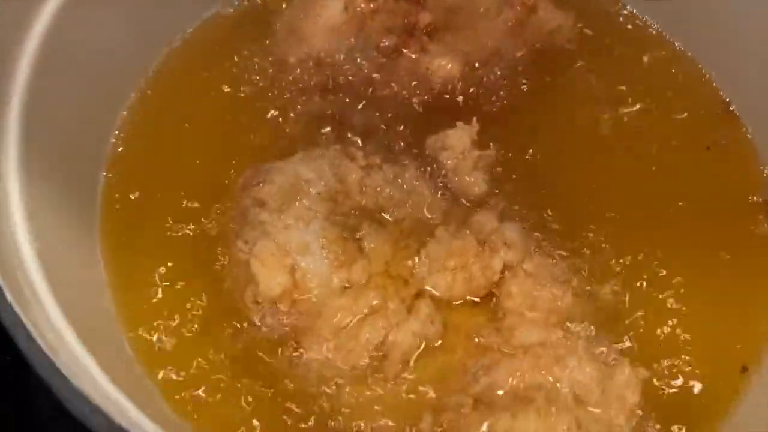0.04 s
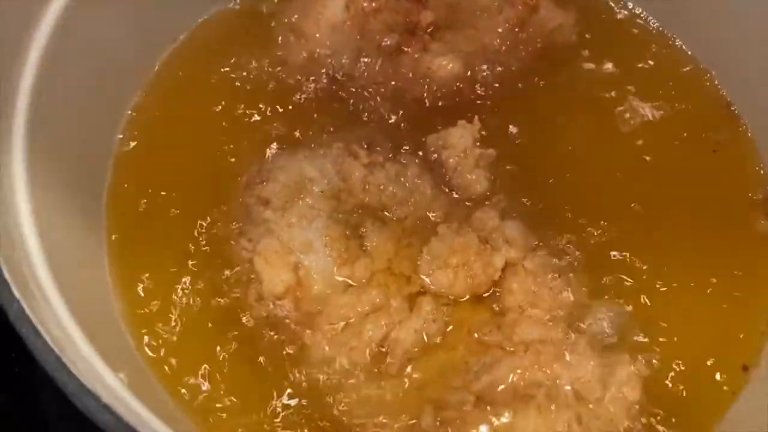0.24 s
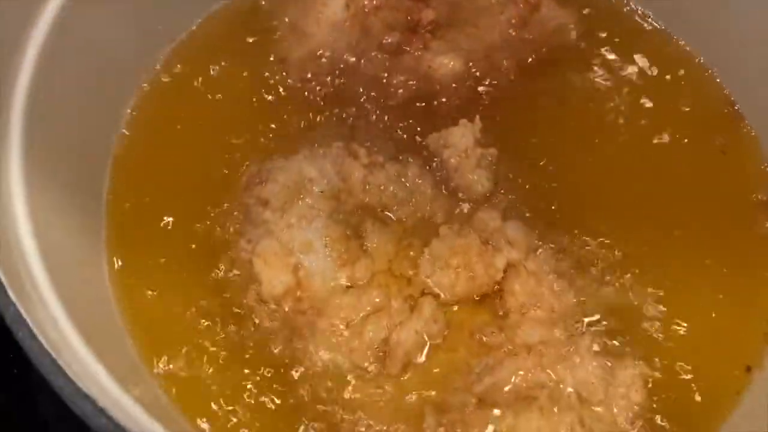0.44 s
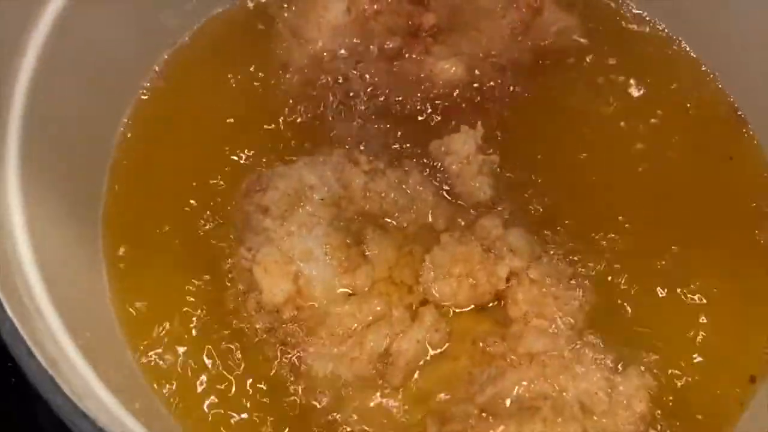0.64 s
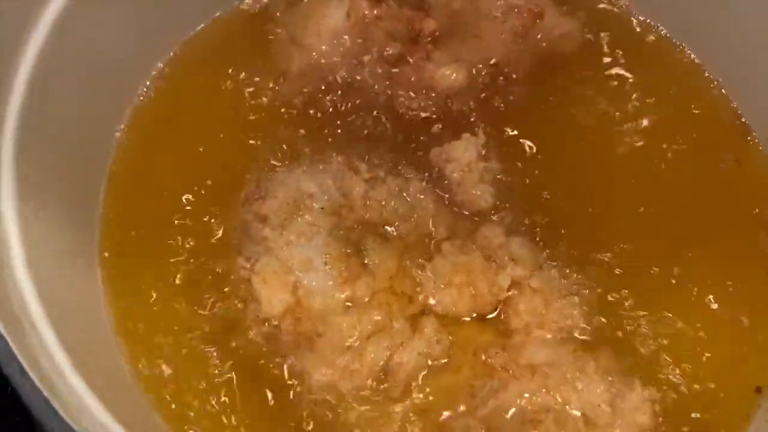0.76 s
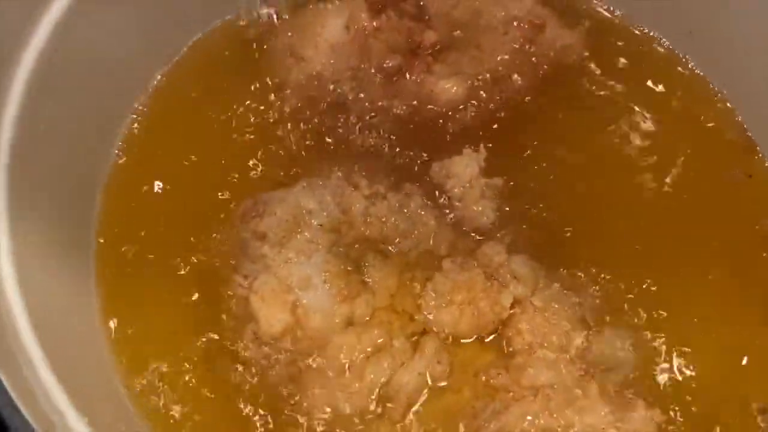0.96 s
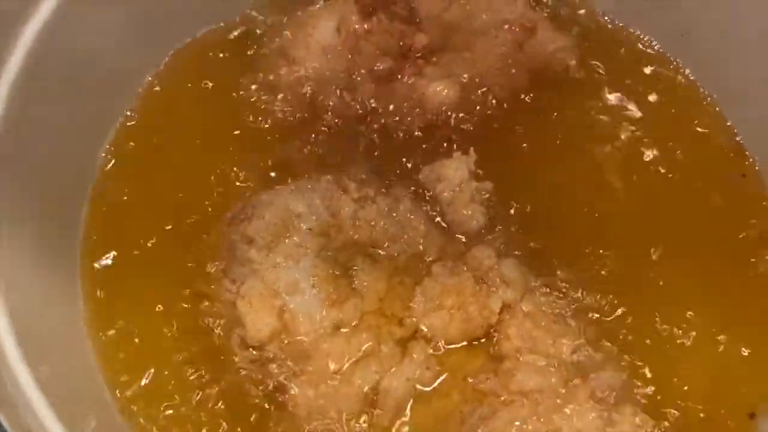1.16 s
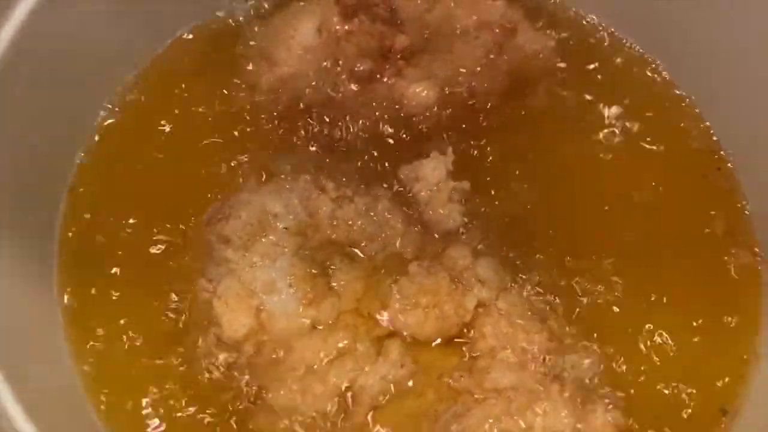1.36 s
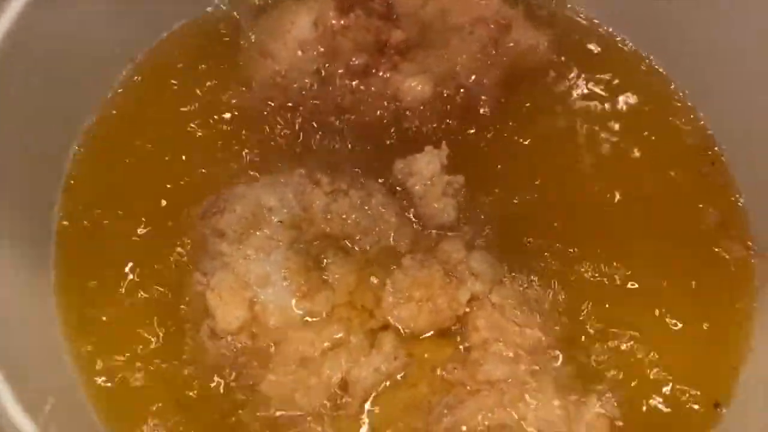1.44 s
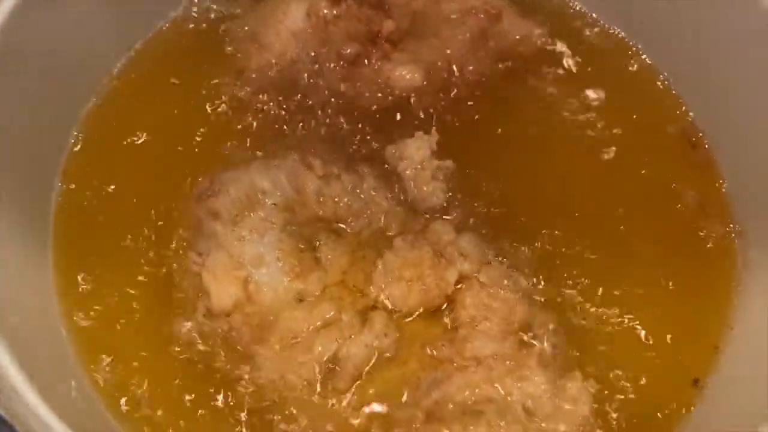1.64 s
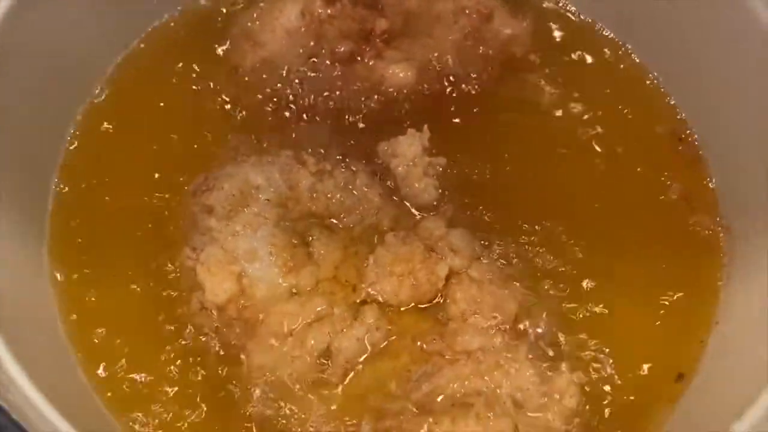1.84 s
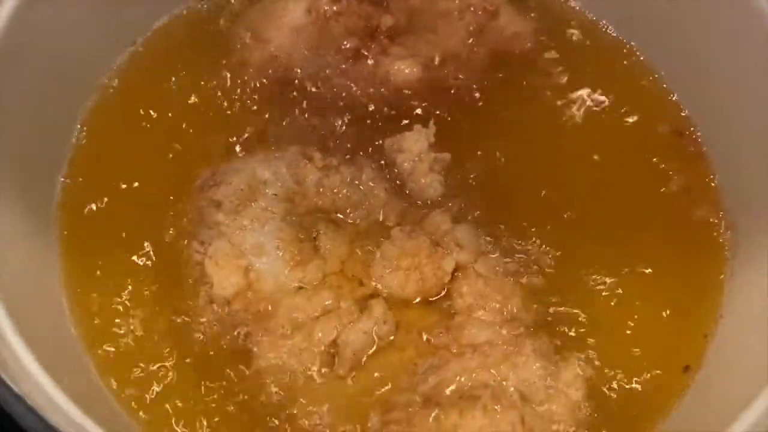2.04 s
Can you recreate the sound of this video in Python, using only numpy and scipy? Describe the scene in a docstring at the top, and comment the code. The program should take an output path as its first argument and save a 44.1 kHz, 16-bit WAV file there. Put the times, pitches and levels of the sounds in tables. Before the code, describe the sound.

Chicken pieces fry in a pot of hot oil with a dense, unbroken sizzle; irregular dry snaps and short ringing pops stand out, while a low wavering burner or fan hum rumbles beneath. Close stereo microphone above the pot.

```python
"""Chicken fries in a pot of hot oil, heard from just above. Thousands of tiny steam bubbles burst each second
in a dense sizzle, made of short fading rings over noise. A few bubbles snap sharply, ring briefly or
come in quick flurries, and the pot walls throw bubble sounds back as short noisy echoes.
Under it lies a low rumble of filtered noise with a wavering hum, probably the burner and an extractor fan."""
import sys
import numpy as np
from scipy import signal
from scipy.fft import rfft, irfft, next_fast_len
from scipy.io import wavfile
from scipy.ndimage import uniform_filter1d, map_coordinates

SR = 44100
rng = np.random.default_rng(int(sys.argv[2]) if len(sys.argv) > 2 else 0)


def to_wav(sig):
    """Store sig (one row per channel, or 1-D mono) as 16-bit WAV at the path in sys.argv[1].

    Samples outside -1..1 are clipped; the rate is SR.
    """
    pcm = np.clip(np.atleast_2d(sig), -1, 1) * 32767
    pcm = np.round(pcm).astype(np.int16)
    wavfile.write(sys.argv[1], SR, pcm.T)  # frames by channels


N = 92345  # length in samples
TOP_HZ = 15800  # nothing sounds above this


def amp(db):
    """Turn decibels into a plain multiplier."""
    return 10 ** (np.asarray(db) / 20)


def unit(x):
    """Scale a signal to an average (RMS) level of 1."""
    return x / np.sqrt(np.mean(x ** 2) + 1e-20)


def along(points, hz):
    """Read a value at each frequency from (Hz, value) points on a log axis."""
    f, v = np.transpose(points)
    return np.interp(np.log(hz + 1), np.log(f + 1), v)


def curve(rows):
    """One value per sample from (s, value) rows."""
    return np.interp(np.arange(N) / SR, *np.transpose(rows))


def wobble(rate):
    """A smooth random curve through `rate` random points a second."""
    points = rng.standard_normal(int(N * rate / SR) + 4)
    return map_coordinates(points, [np.arange(N) * rate / SR])


def filtered(x, response):
    """Multiply the spectrum of x by a response that depends on frequency."""
    m = next_fast_len(N + SR // 2)
    hz = np.fft.rfftfreq(m, 1 / SR)
    return irfft(rfft(x, m) * response(hz), m)[..., :N]


def add(track, s, sound):
    """Mix a sound into a track at time s, cutting what runs past the end."""
    part = track[..., round(s * SR):][..., :sound.shape[-1]]
    part += sound[..., :part.shape[-1]]


def stove(size=1900):
    """Low rumble from shaped noise with a wavering hum; the band around the hum surges."""
    # Colour of the rumble: pitch_hz [Hz], level_db [dB per Hz, relative]
    rumble_colour = [(8, -70), (22, -44), (32, -39), (45, -12), (58, -5.5), (70, -8), (88, -0.5), (104, -5),
                     (122, 1), (145, -4), (200, -10.5), (228, -8.5), (255, -11), (278, -5.5), (305, -5),
                     (330, -11), (400, -22), (600, -25), (1200, -51)]
    # Surges of the band around the hum: time_s [s], level_db [dB, before the common trim]
    surges = [(0.0, -25), (0.02, -23), (0.05, -31), (0.09, -25.5), (0.12, -31), (0.15, -22), (0.18, -27),
              (0.35, -21), (0.42, -30.5), (0.44, -24), (0.47, -30), (0.49, -25), (0.72, -23.5), (0.74, -28),
              (0.8, -34), (0.84, -24.5), (0.86, -27), (0.94, -18), (0.99, -27), (1.08, -28.5), (1.11, -23),
              (1.13, -28.5), (1.22, -23), (1.29, -31.5), (1.32, -21.5), (1.34, -32), (1.37, -23.5),
              (1.44, -26), (1.59, -26.5), (1.61, -19.5), (1.66, -29.5), (1.76, -23.5), (1.79, -29),
              (1.8, -24), (1.87, -26.5), (1.89, -24), (1.91, -33), (1.93, -20.5), (2.0, -29), (2.02, -21),
              (2.07, -32), (2.09, -27)]
    hum_hz, hum_db = 121.1, -9  # level against the rumble
    waver_db, drift_rad = 6, 1.6  # multiply random curves of level and phase
    above_hz, below_hz, trim_db = 61, 185, -0.84  # edges of the surging band, and its trim

    rumble = unit(filtered(rng.standard_normal((2, N)), lambda hz: amp(along(rumble_colour, hz))))
    phase = 2 * np.pi * hum_hz * np.arange(N) / SR + drift_rad * wobble(8.3)
    hum = np.sin(phase) * amp(waver_db * wobble(11))
    low = filtered(rumble, lambda hz: 1 / (1 + (hz / below_hz) ** 8) - 1 / (1 + (hz / above_hz) ** 8))
    deep = low + amp(hum_db) * np.array([unit(hum), np.zeros(N)])
    # level out the band's own ups and downs, so that the table alone sets the surges
    power = np.abs(uniform_filter1d(deep ** 2, size, axis=1))
    even = deep / np.sqrt(power + 1e-9)
    surge_db = curve(surges)
    return amp(surge_db + trim_db) * even + amp(surge_db.mean()) * (rumble - low)


def pot(x, size=2048):
    """A sound and its quick echoes off the pot walls, drawn anew for every place in the oil."""
    t60_s, wet_db, build_s = 0.048, -4, 0.00067  # fade by 60 dB, energy against the direct sound, build-up
    t = np.arange(size) / SR
    echo = rng.standard_normal(size) * amp(-60 * t / t60_s) * (1 - np.exp(-t / build_s))
    echo *= amp(wet_db) / np.linalg.norm(echo)
    echo[0] = 1  # the direct sound
    return signal.fftconvolve(x, echo)


def bubbles(rate, cycles, cap_db, lowest_hz, size, count=3):
    """Tiny bubbles bursting in clumps at several places, each a short damped ring."""
    cycle_spread = 0.51  # how widely ring lengths vary
    size_spread_db, clump_db = 4.5, 1  # mean rise of bubble level; scale of the random clumping
    out, k = np.zeros(N), np.arange(size)
    for stream in rng.spawn(count):
        u = stream.random((int(rate * N / SR / count), 4))
        start = (u[:, 0] * N).astype(int)
        hz = lowest_hz + u[:, 1] * (TOP_HZ - lowest_hz)
        # samples to fall to 1/e, with a bell-like (logistic) spread of its logarithm
        stretch = np.exp(cycle_spread * np.log(u[:, 2] / (1 - u[:, 2])) / 2)
        life = np.clip(cycles * stretch * SR / hz, 1, size / 4)
        # many weak bubbles, few strong ones
        db = np.minimum(-size_spread_db * np.log(1 - u[:, 3]), cap_db)
        db = db + clump_db * wobble(40.04)[start]
        strength = amp(db) / np.sqrt(life)
        fade = np.exp(-k / life[:, None])
        rings = strength[:, None] * fade * np.sin(2 * np.pi * hz[:, None] * k / SR)
        place = np.bincount((start[:, None] + k).ravel(), rings.ravel())
        out += pot(place)[:N]
    return unit(out)


def crackle():
    """Many dry bursts and fewer bubbles that ring on; cycles count the swings of a typical fall to 1/e."""
    dry_bursts = bubbles(rate=8000, cycles=1.23, cap_db=20.5, lowest_hz=308, size=128)
    ringing = bubbles(rate=1100, cycles=7.2, cap_db=14.5, lowest_hz=2005, size=700)
    return unit(dry_bursts + amp(-7) * ringing)


def patchy(x, depth_db, size=256):
    """Swarms of like-sized bubbles come and go, so that bands swell and fade."""
    z = signal.stft(x, nperseg=size)[2]
    patch = np.outer(np.hanning(7), np.hanning(14))  # smooths over pitch and time
    field = signal.fftconvolve(rng.standard_normal(z.shape[1:]), patch, 'same')
    return signal.istft(z * amp(depth_db * unit(field)), nperseg=size)[1][:, :N]


def ping(hz, t60, size=2048):
    """One larger bubble: a short ring whose pitch climbs."""
    attack_s, rise = 0.00021, 0.076  # onset; share by which the pitch climbs during t60
    t = np.arange(size) / SR
    ring = np.sin(2 * np.pi * hz * t * (1 + rise * t / t60 / 2))
    return pot(ring * amp(-60 * t / t60) * (1 - np.exp(-t / attack_s)))


def snap(hz, octaves, size=1024, count=8):
    """A sharp burst: a cluster of heavily damped rings around one pitch."""
    t60_s = 0.0048  # time to fade by 60 dB: it dies almost at once
    t = np.arange(size) / SR
    offsets = np.linspace(-1, 1, count) + rng.uniform(-1, 1, count) / count
    pitches = hz * 2 ** (octaves * offsets)
    rings = np.sin(2 * np.pi * (pitches[:, None] * t + rng.random((count, 1)))).sum(0)
    fade = amp(-60 * t / t60_s)
    # the same energy however the rings happen to add up
    return pot(rings * fade * np.linalg.norm(fade) / np.linalg.norm(rings * fade))


def pops(count=7):
    """Bubbles that stand out: dry snaps, rings of climbing pitch and quick flurries."""
    # Sharp bursts at the surface: start_s [s], pitch_hz [Hz], half_width [octaves], level_db [dB]
    snaps = [(0.015, 3330, 0.55, -15), (.186, 12000, .3, -28), (.2835, 11000, .5, -19),
             (.317, 3600, .7, -21), (0.44, 2240, 0.47, -13), (.4717, 4500, 1, -17), (.5029, 8900, .8, -12),
             (.5165, 3300, .6, -16), (.551, 5700, 0.45, -17), (.677, 7000, .7, -16.5),
             (.7459, 10900, 0.46, -16), (.8527, 6000, 1, -21), (.9075, 9000, .7, -20),
             (0.97, 5500, 0.56, -19), (1.0916, 2830, 0.51, -12.5), (1.0912, 7360, .2, -14.5),
             (1.1025, 12000, .3, -15.5), (1.202, 11500, 0.43, -18), (1.4277, 10200, 0.09, -13),
             (1.473, 13000, .3, -15), (1.5109, 14500, .2, -14.5), (1.5125, 5500, 0.44, -20),
             (1.6215, 3000, 1, -16), (1.7635, 3500, .2, -18), (2.034, 2580, .4, -18)]
    # Larger bubbles that ring: start_s [s], pitch_hz [Hz], fade_by_60_db_s [s], level_db [dB]
    pings = [(.018, 2900, .01, -16.5), (.553, 6900, 0.0087, -15), (.653, 2900, 0.0073, -16.5),
             (.676, 7800, .008, -12), (.826, 10850, 0.0067, -12), (.838, 2790, 0.014, -11.5),
             (.853, 8240, 0.0076, -7.5), (.888, 6150, .01, -19), (.969, 4700, .01, -12),
             (1.243, 7060, .01, -15), (1.312, 5760, .01, -14), (1.416, 7500, .006, -17),
             (1.429, 4080, .013, -14.5), (1.477, 7450, .008, -14), (1.527, 7830, .01, -13),
             (1.724, 6000, .008, -13.5), (1.7625, 2760, .008, -10.5), (1.821, 5400, 0.0078, -14),
             (1.868, 2700, .01, -16), (1.880, 6700, .01, -16)]
    # Flurries from one vent in the crust: start_s [s], length_s [s], pitch_hz [Hz],
    # level_db of each bubble [dB]
    flurries = [(.448, 0.015, 2140, -22.5), (.47, .018, 7730, -23), (1.028, .011, 2800, -20),
                (1.089, .007, 2300, -27), (1.433, 0.007, 10200, -23), (2.009, .012, 2460, -25)]
    pitch_spread, flurry_t60_s = 0.132, 0.012  # log-normal spread of pitch; ring time
    out = np.zeros(N)
    for s, hz, octaves, db in snaps:
        add(out, s, amp(db) * snap(hz, octaves))
    for s, hz, t60, db in pings:
        add(out, s, amp(db) * ping(hz, t60))
    for s, length, hz, db in flurries:
        for _ in range(count):
            when = s + length * rng.random()
            pitch = hz * np.exp(pitch_spread * rng.normal())
            add(out, when, amp(db) * ping(pitch, flurry_t60_s))
    return np.array([out, np.zeros(N)])  # shared part only, nothing opposed


def sizzle():
    """Near crackles over the blur of countless fainter ones; the treble swells with the boiling."""
    # Colour of the sizzle: pitch_hz [Hz], level_db [dB per Hz, relative]
    sizzle_colour = [(20, -70), (150, -9.5), (380, -5), (560, -4.5), (660, -10.5), (790, -2.5), (920, -1.5),
                     (1060, -4), (1260, -1.5), (1500, -7), (2100, -6.5), (2350, -12.5), (2750, -9),
                     (3200, -10.5), (4500, -12), (6500, -11.5), (8300, -9.5), (10000, -12), (12500, -12),
                     (15500, -14)]
    # Share of the power that comes as separate crackles: pitch_hz [Hz], share [0-1]
    crisp_share = [(500, 0.05), (1300, 0.21), (2600, 0.35), (6000, 0.61), (9000, 0.75), (12000, 0.82)]
    # Swelling of the treble: time_s [s], level_db [dB, only its changes count]
    treble = [(0, -32), (.2, -31), (.43, -32.5), (.48, -29.5), (.53, -32), (.62, -32), (.68, -30.5),
              (.8, -31.5), (.97, -29.5), (1.1, -30), (1.33, -30.5), (1.47, -31.5), (1.6, -29.5),
              (1.85, -30.5), (2.09, -31)]
    # Air resonances of the pot: pitch_hz [Hz], width_hz [Hz], lift_db [dB]
    pot_modes = [(506.5, 13.5, 6.5), (744.5, 17, 4.5), (894, 46, 4.5), (2070, 24, 3), (2366, 23, 9.5),
                 (2602, 63, 7.5), (3770, 84, 1)]
    level_db, swell_from_hz = -24, 2800

    crisp = lambda hz: np.clip(along(crisp_share, hz), 0, 1)
    near = filtered(np.array([crackle(), crackle()]), lambda hz: np.sqrt(crisp(hz)))
    blur = filtered(rng.standard_normal((2, N)), lambda hz: np.sqrt(1 - crisp(hz)))
    lift = lambda hz: sum(db / (1 + (2 * (hz - centre) / width) ** 2) for centre, width, db in pot_modes)
    colour = lambda hz: amp(along(sizzle_colour, hz) + lift(hz)) * (hz < TOP_HZ)
    both = unit(filtered(near + blur, colour))
    high = filtered(both, lambda hz: hz ** 2 / (hz ** 2 + swell_from_hz ** 2))
    treble_db = curve(treble)
    swell_db = treble_db - treble_db.mean() + 0.59 * wobble(29.3)
    return amp(level_db) * (both - high + amp(swell_db) * patchy(high, depth_db=1.54))


def spread(pair):
    """A shared and an opposed part make left and right; in the treble the phase between them turns steadily."""
    # Left-right likeness of equally strong parts: pitch_hz [Hz], coherence [0-1]
    alike = [(100, 1), (280, 0.89), (450, 0.41), (700, 0.078), (900, 0.29), (1250, 0.32), (1900, 0.04),
             (2700, 0.43), (3300, 0.47), (4000, 0.52), (5600, 0.19), (6200, 0.25), (7000, 0.96),
             (8500, .999)]
    # Left over right: pitch_hz [Hz], level_db [dB]
    lean = [(200, -.4), (800, 2.3), (2000, -0.6), (4500, 3.5), (7500, -0.5), (12000, -0.5)]
    twist_from_hz, twist_turn_hz = 6880, 4290  # where turning starts; Hz for one full turn

    turn = lambda hz: np.arccos(np.clip(along(alike, hz), -1, 1)) / 2
    mid, side = filtered(pair, lambda hz: np.array([np.cos(turn(hz)), np.sin(turn(hz))]))
    twist = lambda hz: 2 * np.pi * np.maximum(hz - twist_from_hz, 0) / twist_turn_hz
    half = np.array([[.5], [-.5]])  # each side takes half of the lean and twist
    balance = lambda hz: amp(half * along(lean, hz)) * np.exp(-1j * half * twist(hz))
    return filtered(np.array([mid + side, mid - side]), balance)


def scene():
    """The frying pot on its stove."""
    return spread(sizzle() + pops() + stove())


def record(dry):
    """Cut everything from the top frequency upwards."""
    return filtered(dry, lambda hz: hz < TOP_HZ)


dry = scene()
out = record(dry)
to_wav(out)
```